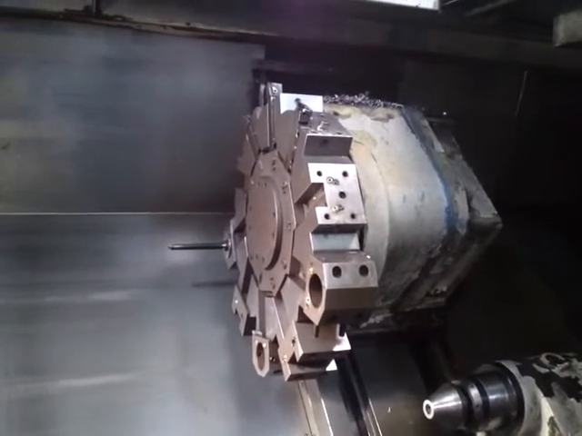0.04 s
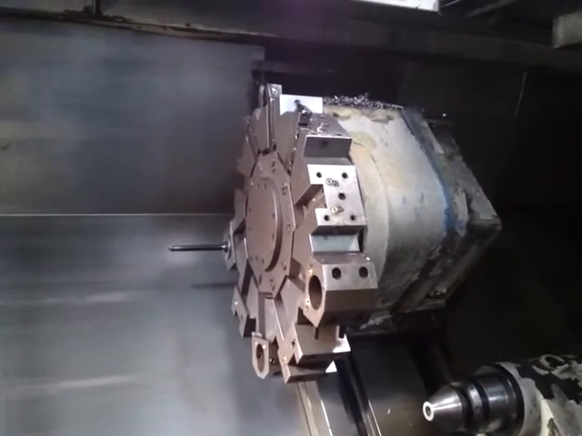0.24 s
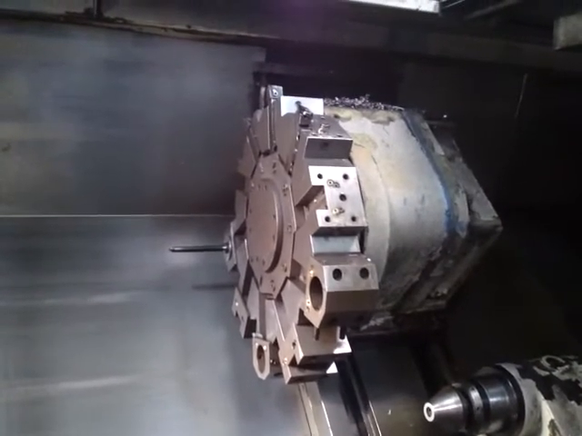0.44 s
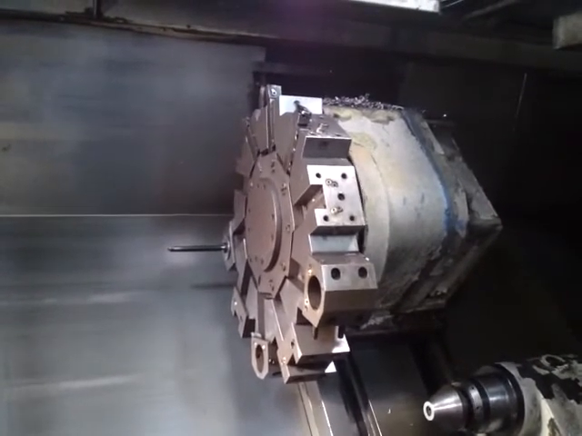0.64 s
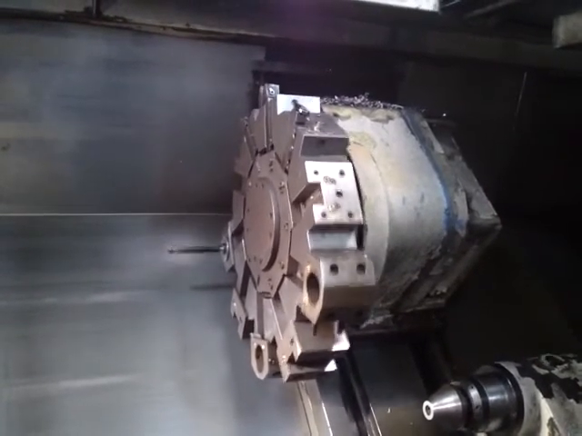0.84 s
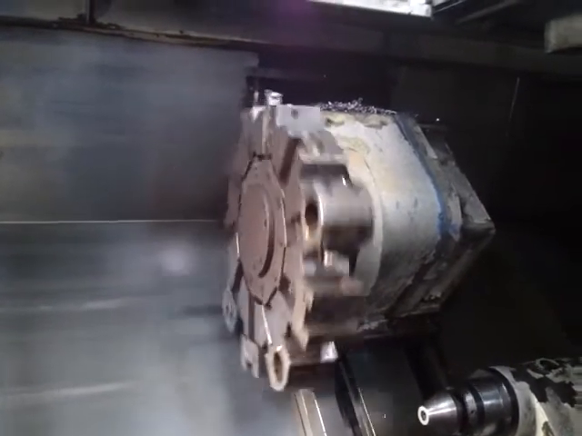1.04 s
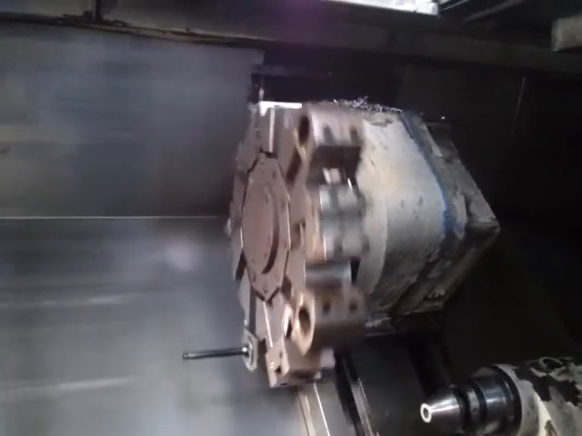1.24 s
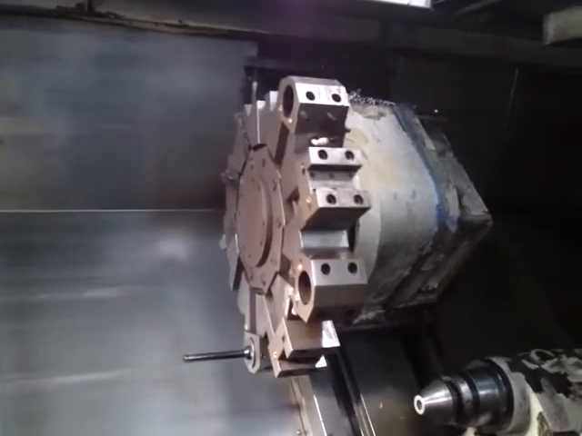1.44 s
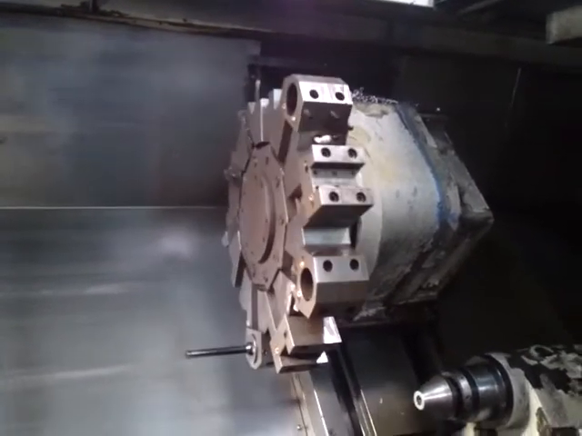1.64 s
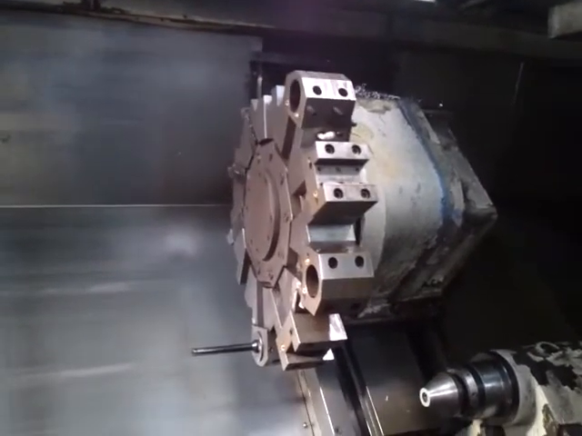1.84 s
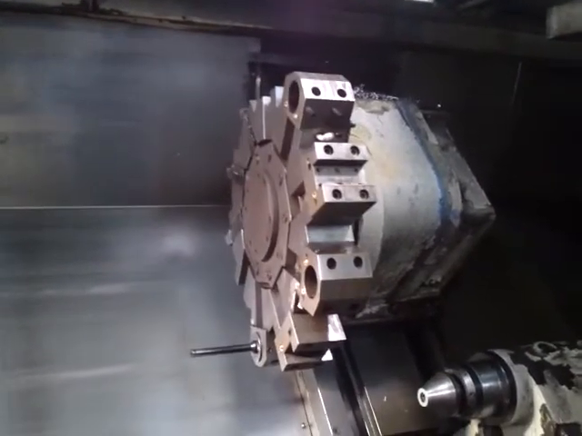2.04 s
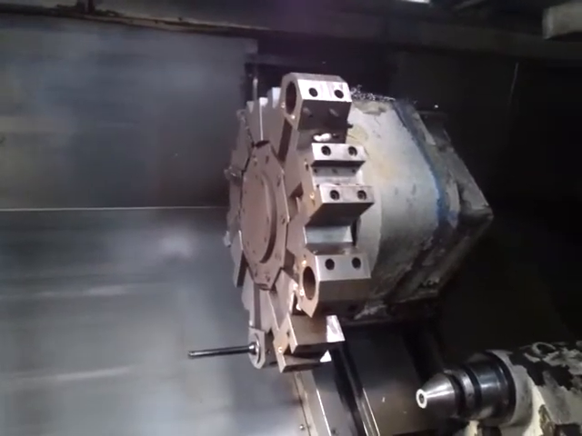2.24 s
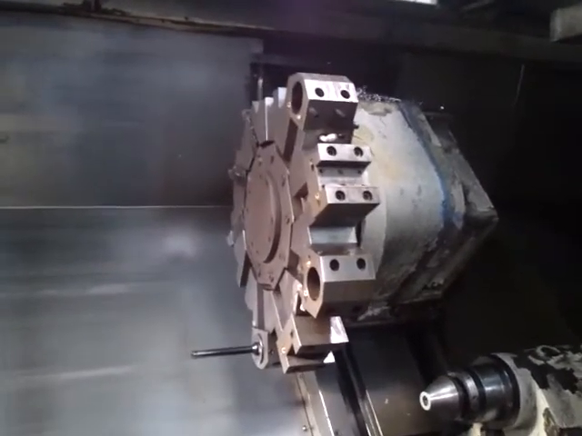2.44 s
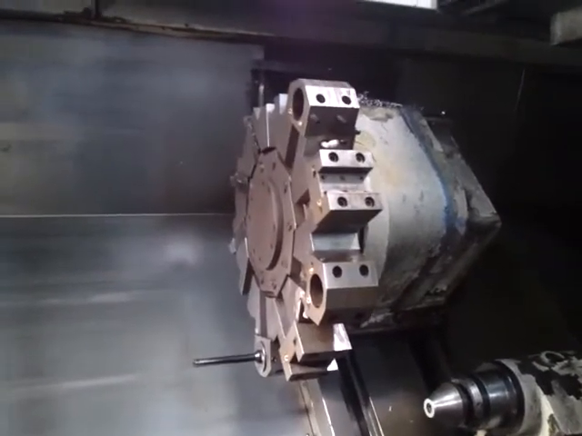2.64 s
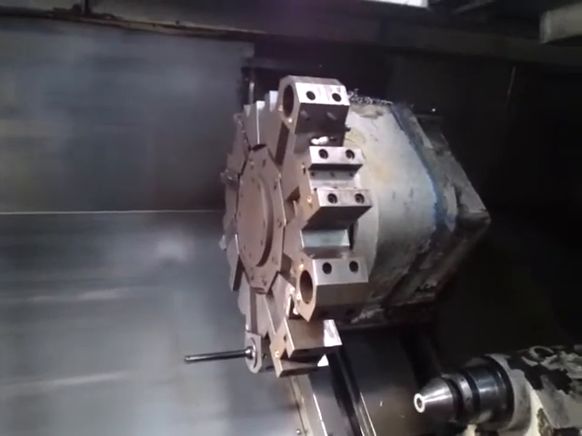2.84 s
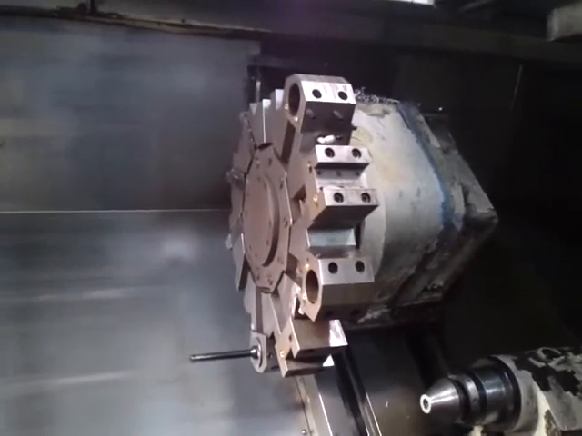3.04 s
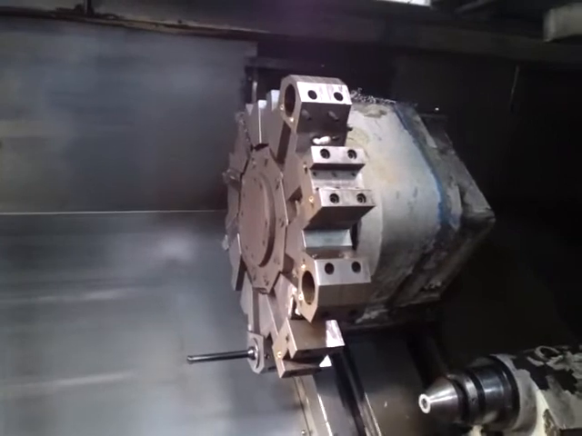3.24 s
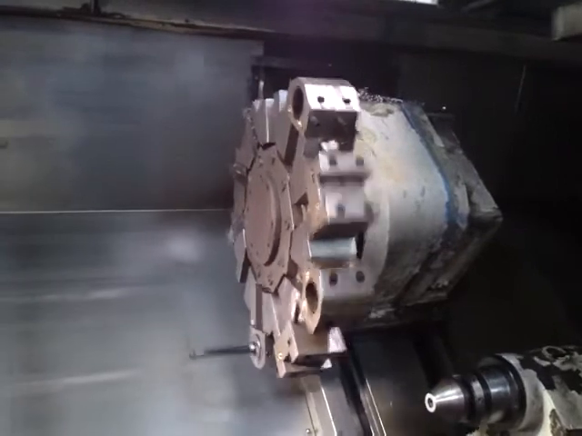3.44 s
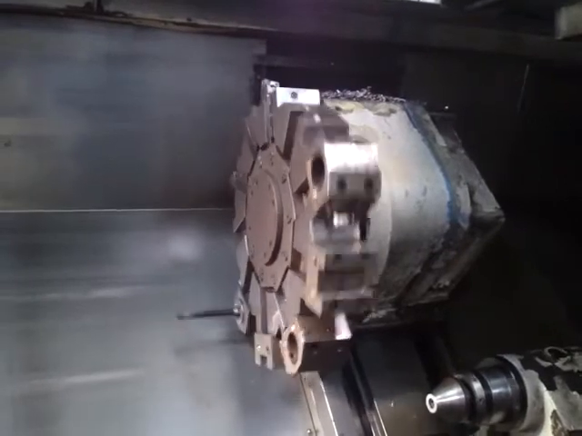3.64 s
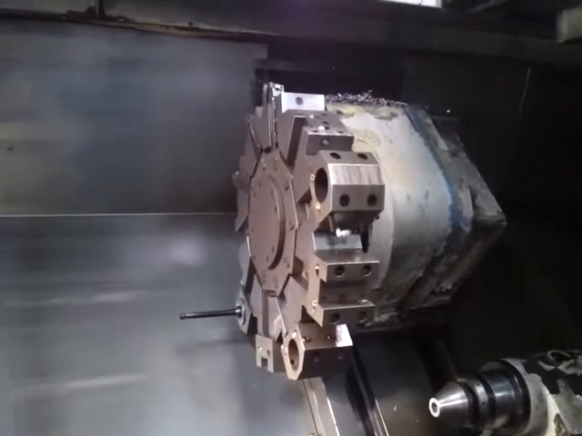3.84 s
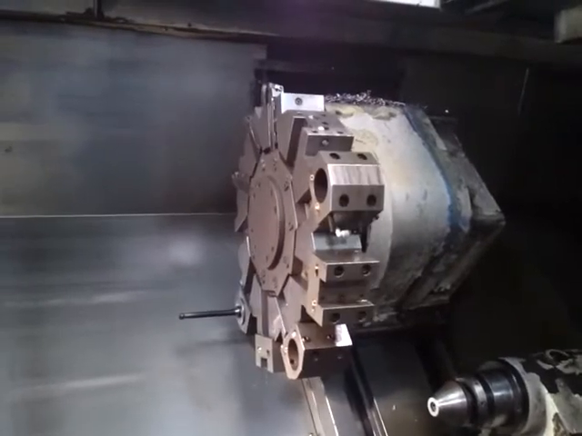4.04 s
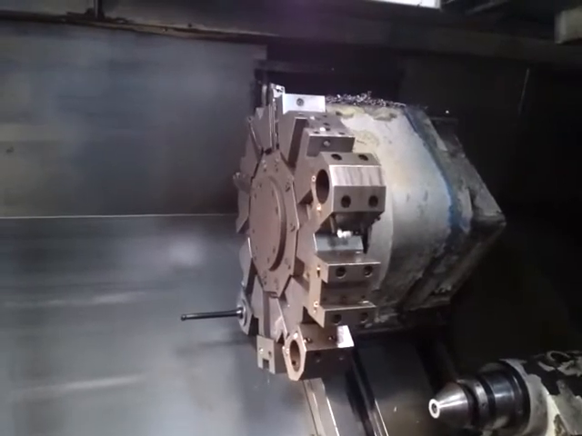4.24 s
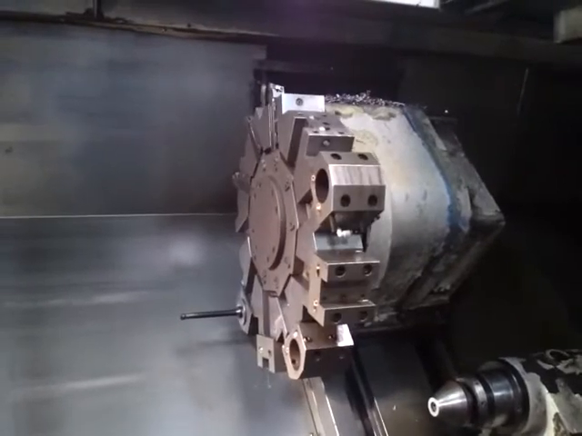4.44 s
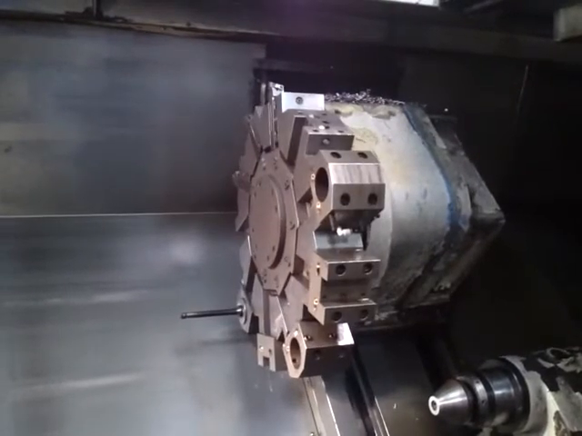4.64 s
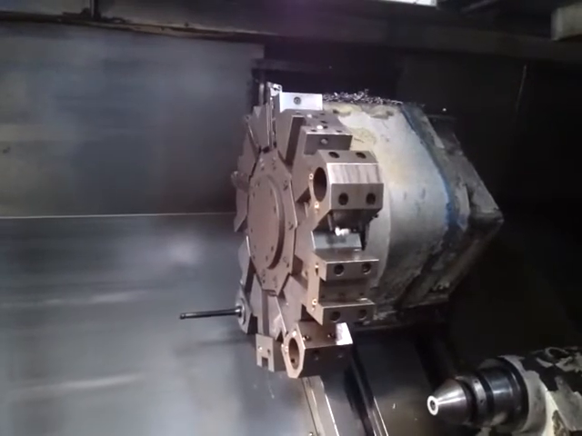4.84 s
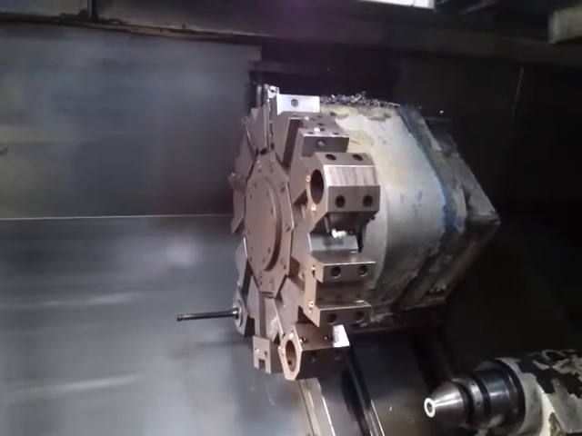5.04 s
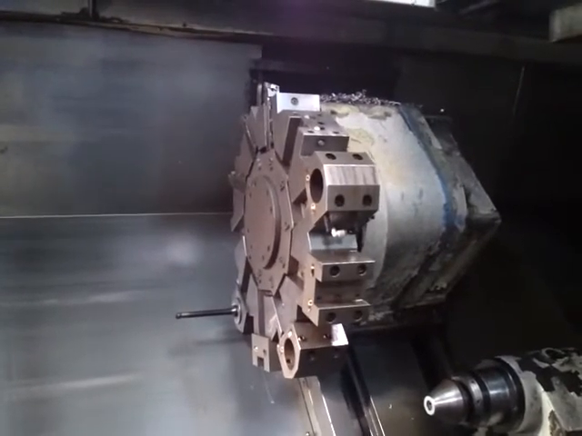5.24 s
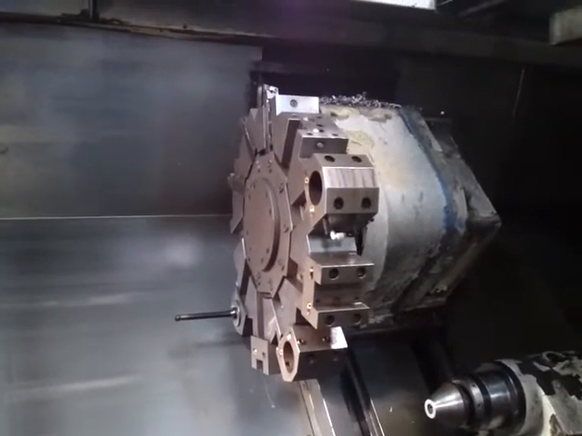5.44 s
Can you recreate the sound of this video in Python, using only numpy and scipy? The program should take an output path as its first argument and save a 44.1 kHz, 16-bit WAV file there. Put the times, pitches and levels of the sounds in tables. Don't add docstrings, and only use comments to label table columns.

```python
import sys
import numpy as np
from scipy import signal
from scipy.fft import rfft, irfft, next_fast_len
from scipy.io import wavfile
from scipy.ndimage import map_coordinates

SR = 44100
rng = np.random.default_rng(int(sys.argv[2]) if len(sys.argv) > 2 else 0)


def decibels_to_gain(level_db):
    exponent = np.asarray(level_db, float) / 20
    return 10 ** exponent


def int16_out(signal):
    q = np.round(np.clip(np.atleast_2d(signal).T, -1, 1) * 32767)
    wavfile.write(sys.argv[1], SR, q.astype(np.int16))


N = 242991
TIME = np.arange(N) / SR

# [f/Hz, width/Hz, level/dB]
EXHAUST = [(3820, 1600, -7), (4460, 1200, -7.5), (5350, 340, -2.5), (6540, 990, 1.5), (6790, 1200, 1.5),
           (7370, 500, -5), (5690, 2200, -2)]

# (f/Hz, width/Hz, t60/s, hold/s)
BASE, BED = (89, 80, .4, 0.01), (210, 170, 0.35, 0.029)
HOUSING, DISC = (870, 300, .18, 0.0047), (1680, 270, .14, 0.015)
SHANK, BOLT = (2800, 560, 0.1, .011), (3300, 400, .08, .006)
PIN, LATCH = (3700, 1000, 0.089, 0.018), (4300, 1100, .11, 0.008)
SPOOL, VENT = (5350, 320, .11, 0.013), (5740, 800, .26, .026)
PORT, NOZZLE = (5900, 650, .17, 0.021), (6750, 300, .09, 0.01)


def evened(x):
    return x / np.sqrt(np.mean(x ** 2) + 1e-20)


def filtered(x, gain):
    size = next_fast_len(len(x), True)
    f_hz = np.fft.rfftfreq(size, 1 / SR) + 1
    return irfft(rfft(x, size) * gain(f_hz), size)[:len(x)]


def coloured(x, points):
    hz, db = np.transpose(points)
    return filtered(x, lambda f: decibels_to_gain(np.interp(np.log(f), np.log(hz), db)))


def ringing(x, modes, tilt_db=0, pivot_hz=1000):
    def gain(f):
        power = sum(decibels_to_gain(2 * db) / (1 + (2 * (f - hz) / w) ** 2) ** 2 for hz, w, db in modes)
        return np.sqrt(power) * decibels_to_gain(tilt_db * np.log2(np.maximum(f, 400) / pivot_hz))
    return filtered(x, gain)


def resonate(x, hz, width_hz):
    turn = np.exp(2j * np.pi * np.cumsum(hz * np.ones(len(x))) / SR)
    r = np.exp(-np.pi * width_hz / SR)
    return 2 * (turn * signal.lfilter([1 - r], [1, -r], x / turn)).real


def drift(rate_hz):
    steps = rng.standard_normal(int(N / SR * rate_hz * 2) + 4)
    return np.repeat(map_coordinates(steps, [TIME[::32] * rate_hz * 2], order=3), 32)[:N]


def flow(open_s, shut_s, rise_s, sag_db_per_s, fall_s):
    swell = np.sin(np.pi / 2 * np.clip((TIME - open_s) / rise_s, 0, 1)) ** 2
    sag_db = sag_db_per_s * (TIME - open_s) * (TIME > open_s)
    return swell * decibels_to_gain(sag_db - 20 * np.clip((TIME - shut_s) / fall_s, 0, 10))


def add(mix, s, sound):
    part = mix[round(s * SR):][:len(sound)]
    part += sound[:len(part)]


def burst(db, rise_s, t60_s, tilt_db, hold_s, modes, grit_db, pivot_hz):
    t = np.arange(SR // 2) / SR
    grit = np.repeat(decibels_to_gain(grit_db * rng.standard_normal(len(t) // 50)), 50)
    swell = np.sin(np.pi / 2 * np.clip(t / rise_s, 0, 1)) ** 2
    decay = decibels_to_gain(-60 * np.maximum(t - rise_s - hold_s, 0) / t60_s)
    rung = ringing(rng.standard_normal(len(t)) * grit, modes, tilt_db, pivot_hz)
    top = rung[round(rise_s * SR / 2):][:round((rise_s + hold_s) * SR) + SR // 100]
    return decibels_to_gain(db) * swell * decay * rung / np.sqrt(np.mean(top ** 2))


def hum():
    # [f/Hz, level/dB rms]
    low_tones = [(51.1, -45), (100.9, -45), (109, -47), (119.8, -43), (275.9, -45), (506, -45),
                 (526.2, -47), (535.6, -47), (553.1, -43), (598.9, -48), (608.3, -51), (803.5, -49),
                 (829, -49), (987.8, -51), (994.6, -50), (1079.4, -51)]
    high_tones = [(1193.7, -52), (1339.1, -50), (1471, -53), (1935.3, -53), (2375.4, -52), (2760.3, -55),
                  (3750.8, -56), (3976.9, -52), (2386.1, -57), (3482, -56), (3870.6, -59), (4375.3, -58),
                  (5369.8, -53), (5540.8, -56), (5570.4, -56), (6050.8, -55), (6420.9, -56), (5625.5, -53),
                  (5653.8, -52), (5967.4, -55), (6163.9, -52), (6932.3, -54)]
    # [start/s, stop/s]; a stop ahead of its start leaves next to no load
    turns = [(.8, 1.36), (3.36, 3.1)]
    pump_hz, pump_db, load_db, load_rise_s = 245.2, -30, 1.5, .15
    load = sum(flow(a, b, load_rise_s, 0, load_rise_s) for a, b in turns)
    pump_gain = decibels_to_gain(pump_db + load_db * load + 0.48 * drift(1.5))
    pump = pump_gain * np.sin(2 * np.pi * pump_hz * TIME + .08 * drift(1.9))
    out = np.zeros(N)
    for tones, trim_db in (low_tones, -.5), (high_tones, -.7):
        for hz, db in tones:
            waver = drift(2.5)
            phase = 2 * np.pi * (hz * TIME + rng.random()) + 0.72 * waver[::-1]
            out += decibels_to_gain(db + trim_db) * (1 + .3 * waver) * np.sin(phase)
    return np.sqrt(2) * (pump + out)


def wash():
    # [f/Hz, level/dB per Hz]
    shop_spectrum = [(20, -10), (35, -5), (75, -7), (130, -4), (220, -1), (320, -3.5), (550, -1.5),
                     (800, -5), (1400, -8), (2100, -12), (3000, -15.5), (4800, -15.5), (6000, -12.5),
                     (7000, -14.5)]
    # [f/Hz, width/Hz, level/dB]
    panels = [(149.3, 12, -2.5), (258.7, 46, -4), (331.4, 14, -3), (376.7, 12.8, -1), (797.5, 21, -11)]
    broad = evened(coloured(rng.standard_normal(N), shop_spectrum))
    hummed = evened(ringing(rng.standard_normal(N), panels))
    return decibels_to_gain(-25.5 + 0.36 * drift(4)) * broad + decibels_to_gain(-35.0) * hummed


def coupling_knocks():
    # [t/s, level/dB rms, tilt/dB per octave]
    knocks = [
        (.356, -21, -0.5),
        (2.942, -21, -1),
        (5.047, -21.5, -1.5),
    ]
    # [f/Hz, width/Hz, level/dB]
    steel = [(547, 370, -9.5), (944, 200, -2.5), (1550, 540, 0), (1720, 340, 0.5), (2460, 280, 0),
             (3280, 480, 0), (3900, 430, -2), (4360, 1300, -5.5), (2000, 5000, -2)]
    rise_s, t60_s, hold_s = .022, 0.29, 0.014
    out = np.zeros(N)
    for s, db, tilt_db in knocks:
        add(out, s, burst(db, rise_s, t60_s, tilt_db, hold_s, steel, grit_db=2., pivot_hz=1500))
    return out


def valve_blasts():
    # [t/s, level/dB rms, t60/s, tilt/dB per octave, hold/s]
    blasts = [
        (0.365, -21.5, 0.14, -2, 0.018),
        (2.953, -17.5, 0.12, 0, .005),
        (5.055, -21.5, .2, 6, .03),
    ]
    rise_s = .014
    out = np.zeros(N)
    for s, db, t60_s, tilt_db, hold_s in blasts:
        add(out, s, burst(db, rise_s, t60_s, tilt_db, hold_s, EXHAUST, grit_db=0.5, pivot_hz=5000))
    return out


def part_rings():
    # [t/s, level/dB rms, part (f/Hz, width/Hz, t60/s, hold/s)]
    rings = [(.365, -31, DISC), (.374, -26.5, SPOOL), (.376, -28, NOZZLE), (.378, -26, HOUSING),
             (.389, -25.5, VENT), (.408, -23.5, BED), (.768, -34.5, LATCH), (.77, -41, SHANK),
             (0.79, -29.5, BASE), (1.097, -35, LATCH), (1.111, -38, SHANK), (1.39, -28, PIN),
             (2.639, -35, BOLT), (2.642, -37.5, PORT), (2.948, -29.5, PIN), (2.955, -30, DISC),
             (2.955, -35, HOUSING), (2.959, -28.5, BED), (2.965, -25.5, NOZZLE), (2.985, -28.5, PORT),
             (3.333, -36.5, PORT), (3.346, -28.5, LATCH), (3.44, -36, LATCH), (3.61, -35, SPOOL),
             (5.065, -30, HOUSING), (5.11, -33, BED)]
    out = np.zeros(N)
    for s, db, (hz, width_hz, t60_s, hold_s) in rings:
        rise_s = 0.68 / width_hz + 0.0028
        modes = [(hz, width_hz, 0)]
        add(out, s, burst(db, rise_s, t60_s, 0, hold_s, modes, grit_db=-1, pivot_hz=400))
    return out


def line_hiss():
    # [open/s, shut/s, level/dB rms, rise/s]
    flows = [(.4, .79, -34, .1), (.8, 1.402, -40.5, .1), (1.42, 2.055, -32, 0.11), (2.98, 3.38, -30, 0.23),
             (3.48, 3.686, -28.5, .13), (3.71, 4.344, -30.5, 0.065), (5.076, 5.469, -28.5, 0.15)]
    # [f/Hz, level/dB]
    hiss_spectrum = [(1500, -29), (2500, -10.5), (3500, -4), (4000, -10.5), (4500, -7), (5000, 0),
                     (5400, -5), (6000, 0), (6800, 2), (7400, -5.5)]
    sag_db_per_s, fall_s = -2.5, .05
    level = sum(decibels_to_gain(db) * flow(a, b, rise_s, sag_db_per_s, fall_s) for a, b, db, rise_s in flows)
    return level * decibels_to_gain(.8 * drift(25)) * evened(coloured(rng.standard_normal(N), hiss_spectrum))


def disc_seatings():
    # [t/s, level/dB rms]
    seatings = [
        (.764, -23.5),
        (3.341, -26),
        (5.453, -24),
    ]
    # [f/Hz, width/Hz, level/dB]
    seat_modes = [(557, 210, 2), (1030, 400, 0), (1460, 660, -2.5), (2900, 900, -13.5), (4380, 1000, -12),
                  (6000, 1500, -14.5)]
    rise_s, t60_s, hold_s = 0.0099, .21, .018
    out = np.zeros(N)
    for s, db in seatings:
        add(out, s, burst(db, rise_s, t60_s, 0, hold_s, seat_modes, grit_db=1.0, pivot_hz=1200))
    return out


def clamp_pops():
    # [t/s, level/dB rms]
    pops = [
        (1.389, -20),
        (3.692, -17.5),
    ]
    rise_s, t60_s, tilt_db, hold_s = 0.0022, 0.15, -5, 0.0091
    bounce_s, bounce_db = .032, -8
    out = np.zeros(N)
    for s, db in pops:
        for late_s, less_db in (0, 0), (bounce_s, bounce_db):
            pop = burst(db + less_db, rise_s, t60_s, tilt_db, hold_s, EXHAUST,
                        grit_db=0.0, pivot_hz=5000)
            add(out, s + late_s, pop)
    return out


def clamp_whistles():
    # [open/s, shut/s, upper level/dB rms, lower level/dB rms, lower rise/s]
    clampings = [
        (1.414, 2.047, -34.5, -36.5, 0.2),
        (3.71, 4.338, -33.5, -34.5, .27),
    ]
    upper_end_hz, upper_drop_hz, upper_settle_s, upper_wander_hz = 6610, 150, 0.18, 50
    upper_rise_s, upper_sag_db_per_s = .1, -3.5
    lower_hz, lower_sag_db_per_s, fall_s = 5385, -4.5, .03
    out = np.zeros(N)
    for a, b, upper_db, lower_db, lower_rise_s in clampings:
        glide_hz = upper_drop_hz * np.exp(-abs(TIME - a) / upper_settle_s)
        upper_hz = upper_end_hz + glide_hz + upper_wander_hz * drift(5)
        upper, lower = rng.standard_normal((2, N))
        upper = evened(resonate(resonate(upper, upper_hz, 230), upper_hz, 650))
        lower = evened(resonate(resonate(lower, lower_hz, 150), lower_hz, 420))
        upper_flow = flow(a, b, upper_rise_s, upper_sag_db_per_s, fall_s)
        lower_flow = flow(a, b, lower_rise_s, lower_sag_db_per_s, fall_s)
        out += decibels_to_gain(upper_db + 1.7 * drift(15)) * upper * upper_flow
        out += decibels_to_gain(lower_db + 0.8 * drift(13)) * lower * lower_flow
    return out


def enclosure(x):
    t = np.arange(SR // 2) / SR
    echoes = rng.choice([-1., 1.], len(t)) * (rng.random(len(t)) < .06) * (t > .004)
    taps = echoes * decibels_to_gain(-60 * t / 1.0)
    return signal.fftconvolve(x, taps / np.linalg.norm(taps))[:N]


def scene():
    turret = coupling_knocks() + valve_blasts() + part_rings() + disc_seatings() + clamp_pops()
    air = line_hiss() + clamp_whistles()
    return np.tile(turret + decibels_to_gain(-7) * enclosure(turret) + air + hum() + wash(), (2, 1))


def top_cut(x):
    return signal.sosfilt(signal.butter(12, 8360, fs=SR, output="sos"), x)


def record(dry):
    # [t/s, side level/dB, low f/Hz, high f/Hz]
    side_patches = [(.586, -47, 6900, 7650), (.864, -51, 6900, 7650), (1.212, -47, 6900, 7650),
                    (1.77, -37, 5150, 6350), (1.862, -32, 4650, 5750), (2.21, -44, 4200, 5200),
                    (2.513, -44, 5700, 7650), (2.537, -43, 5150, 6350), (2.884, -40, 4650, 6350),
                    (4.928, -43, 6250, 7650), (4.975, -48, 6900, 7650), (5.16, -43, 6900, 7650)]
    side = np.zeros(N)
    for s, db, lo, hi in side_patches:
        band = [(lo - 30, -90), (lo, 0), (hi, 0), (hi + 30, -90)]
        patch = evened(coloured(rng.standard_normal(2048), band)) * np.hanning(2048)
        add(side, s - 1024 / SR, decibels_to_gain(db - 1) * patch)
    overloaded = .9 * np.tanh(dry[0] / .9)
    edge = [(7000, 0.5), (7150, -2.5), (7300, -7), (7500, -6.0), (7700, -18.5), (7800, -42.5)]
    hz, _, z = signal.stft(coloured(overloaded, edge), SR, nperseg=2048, noverlap=1024)
    treble_db = 10 * np.log10(np.mean(abs(z[hz > 5000]) ** 2, axis=0) + 1e-20)
    excess_db = np.clip(treble_db - np.median(treble_db) - 4, 0, 10)
    top_hz = 7430 + 42 * np.minimum(rng.exponential(1, z.shape[1]), 4) + 16 * excess_db
    mono = signal.istft(z * (hz[:, None] < top_hz), SR, nperseg=2048, noverlap=1024)[1][:N]
    return top_cut(np.array([mono + side, mono - side]))


dry = scene()
out = record(dry)
int16_out(out)
```